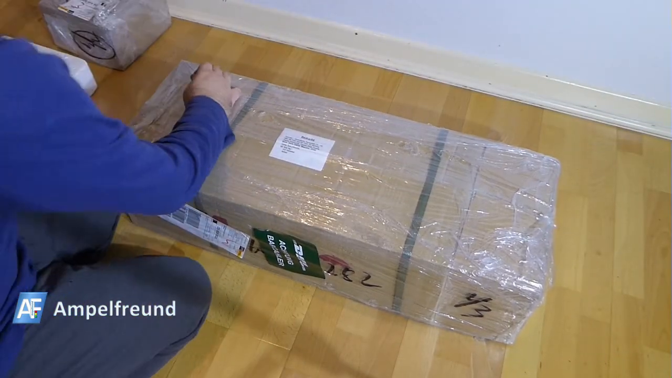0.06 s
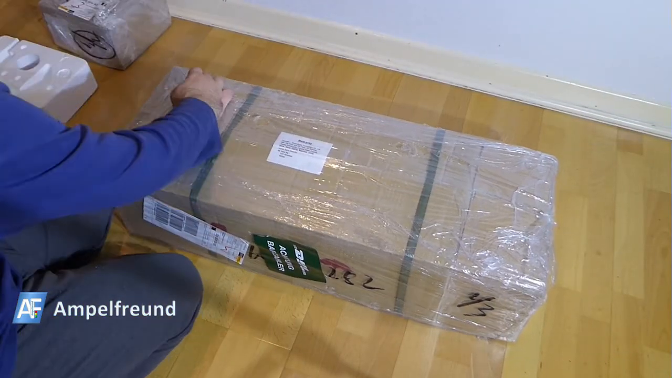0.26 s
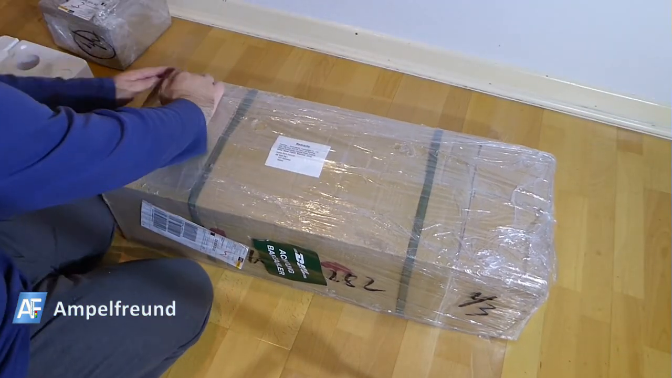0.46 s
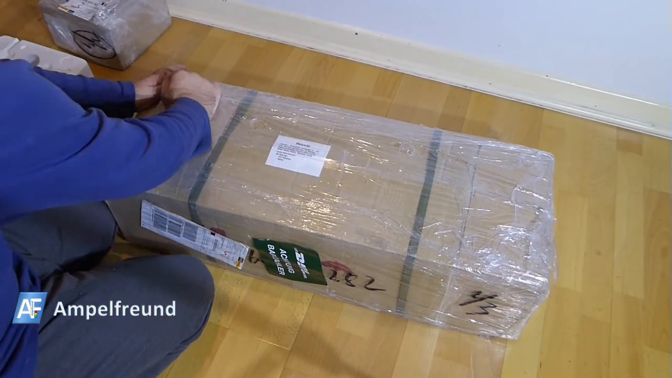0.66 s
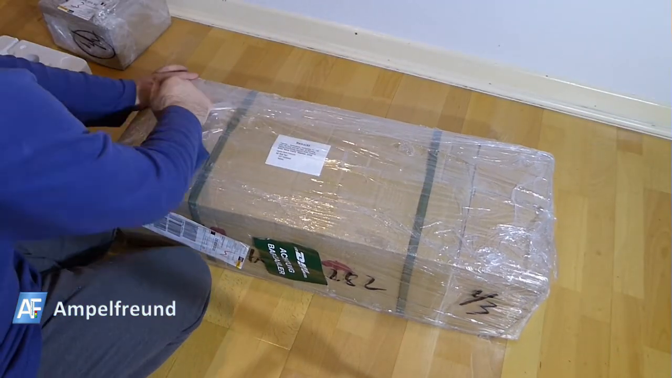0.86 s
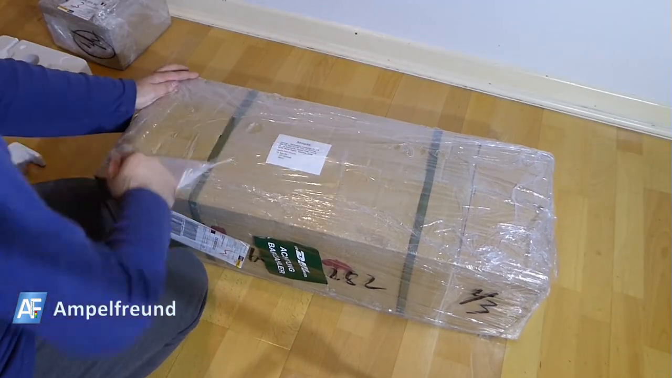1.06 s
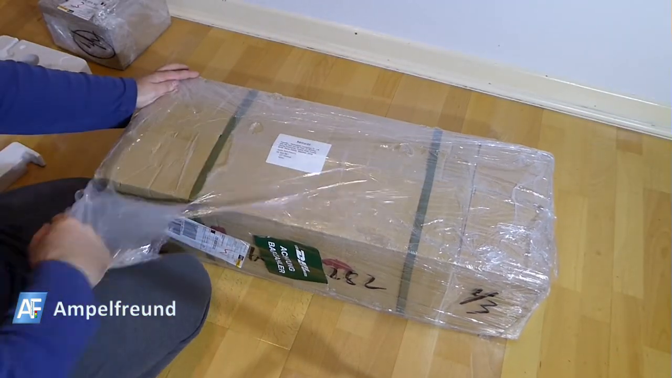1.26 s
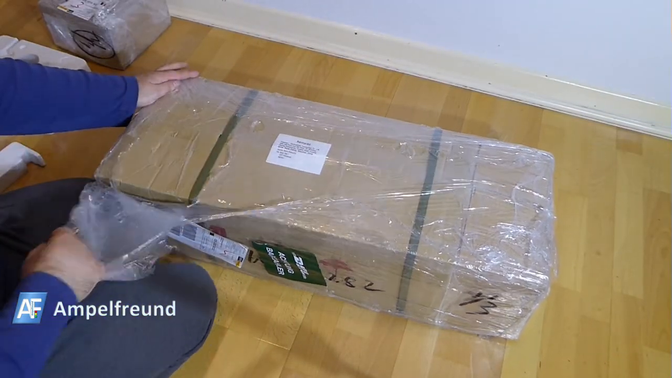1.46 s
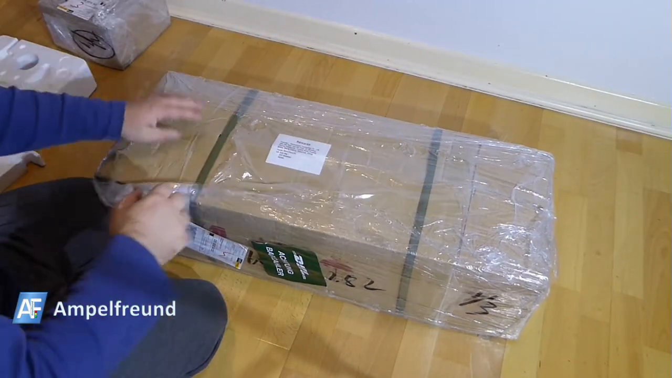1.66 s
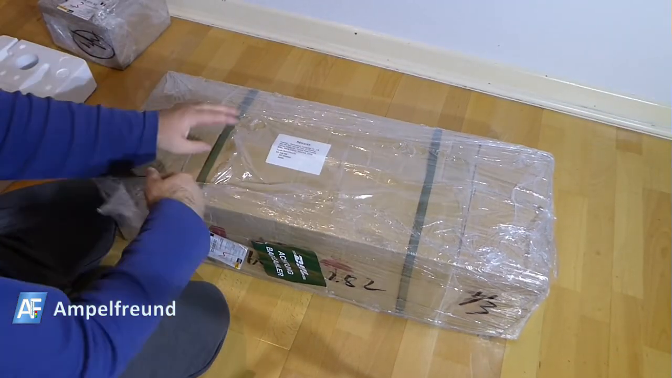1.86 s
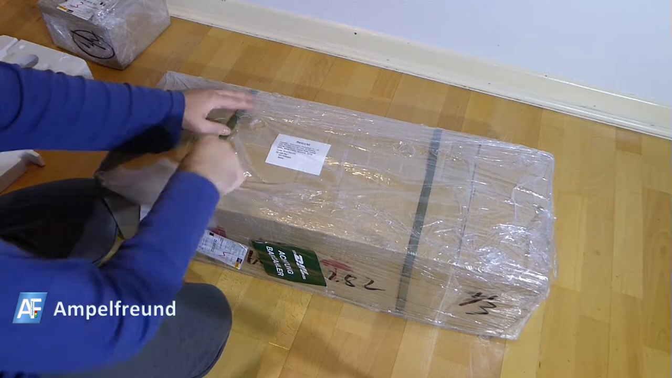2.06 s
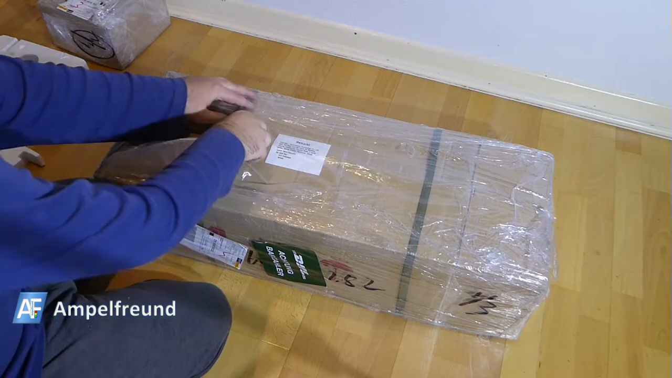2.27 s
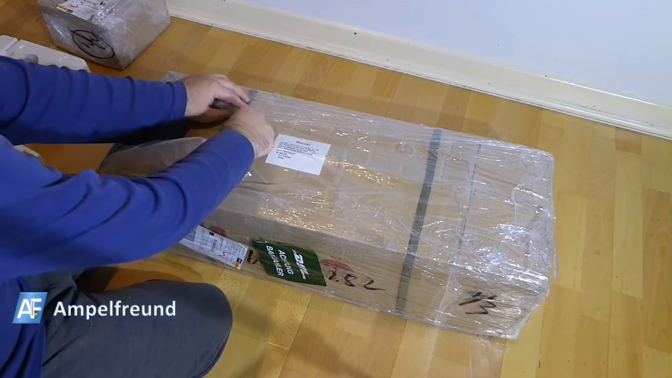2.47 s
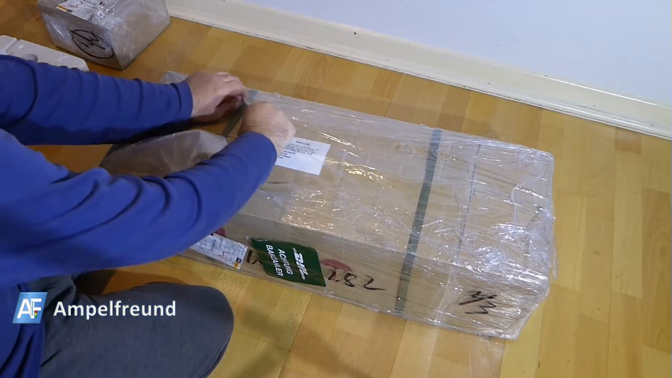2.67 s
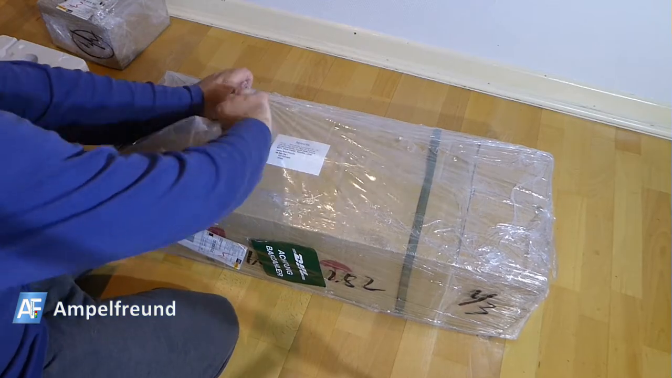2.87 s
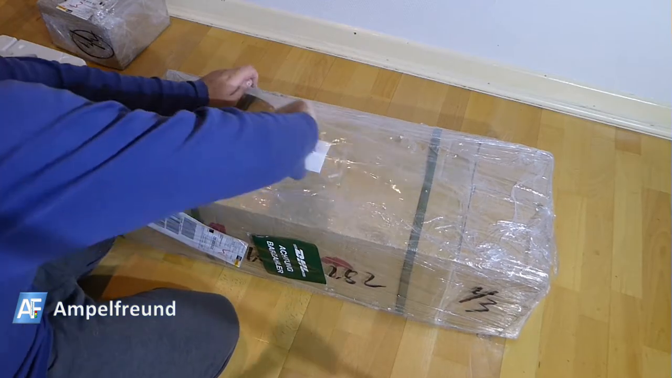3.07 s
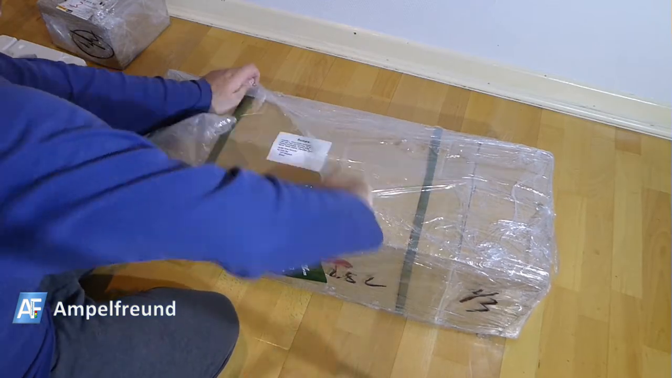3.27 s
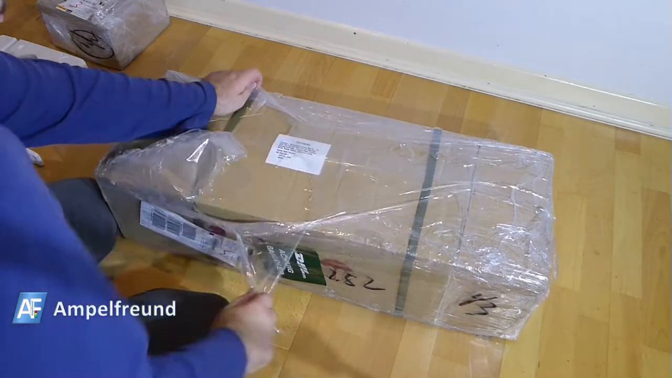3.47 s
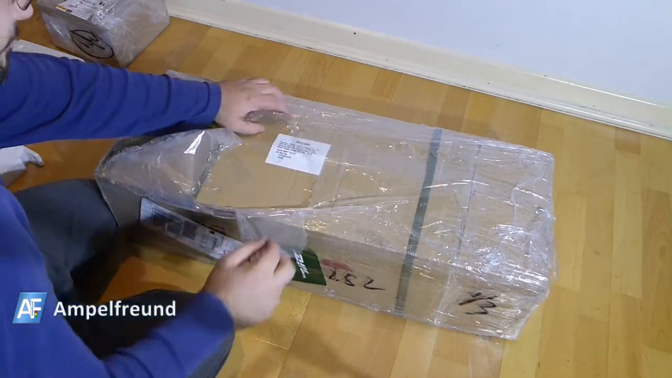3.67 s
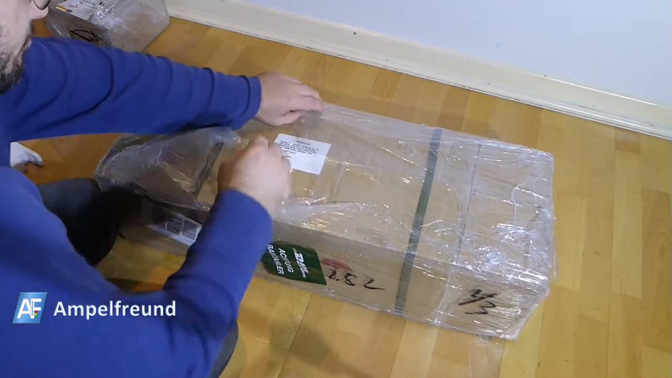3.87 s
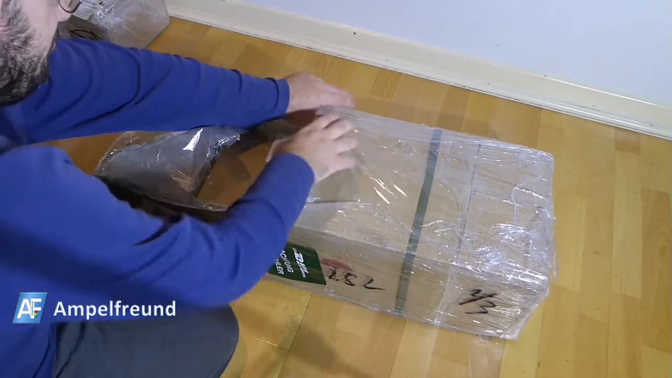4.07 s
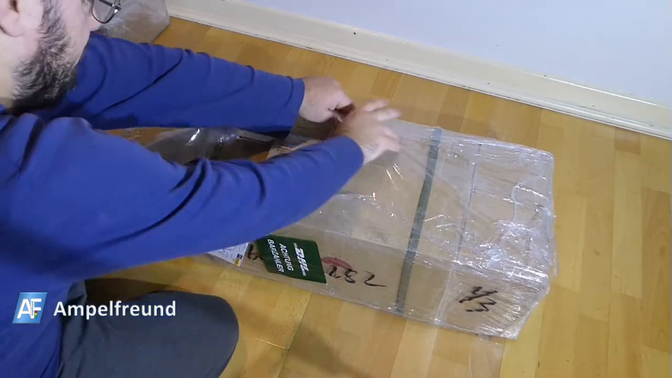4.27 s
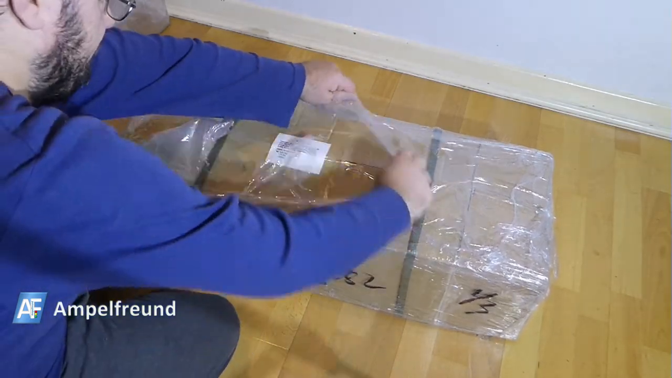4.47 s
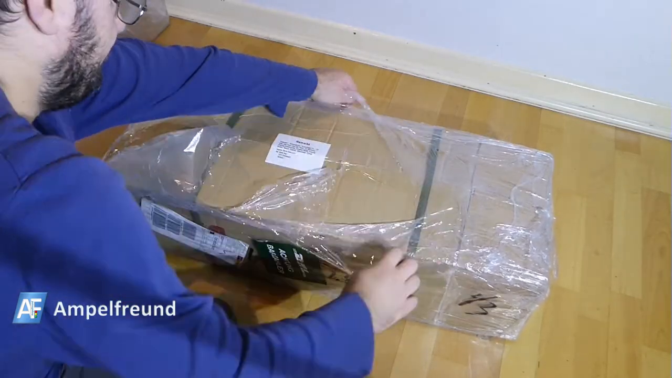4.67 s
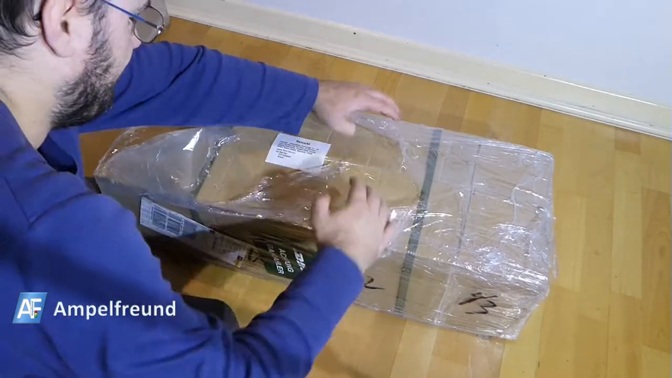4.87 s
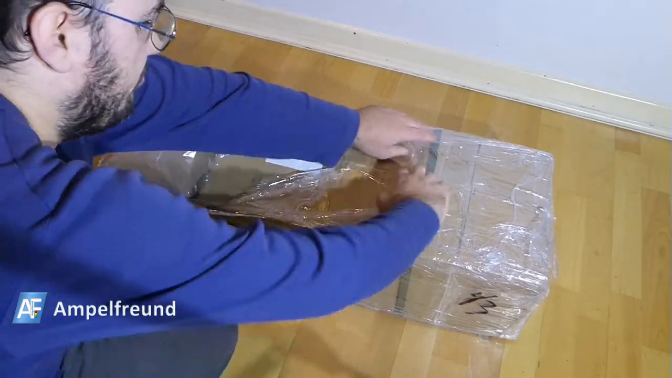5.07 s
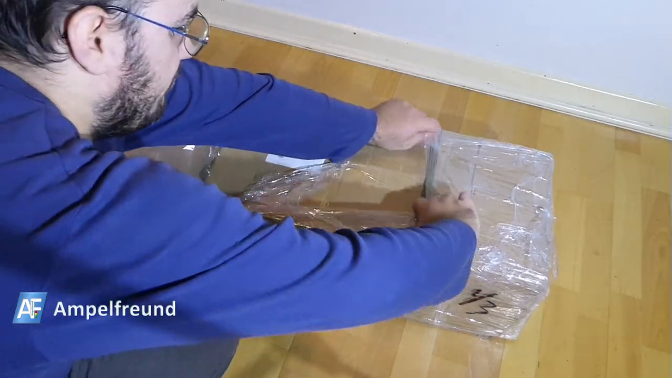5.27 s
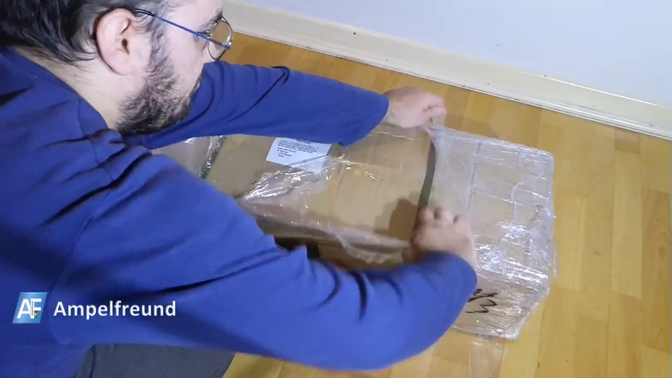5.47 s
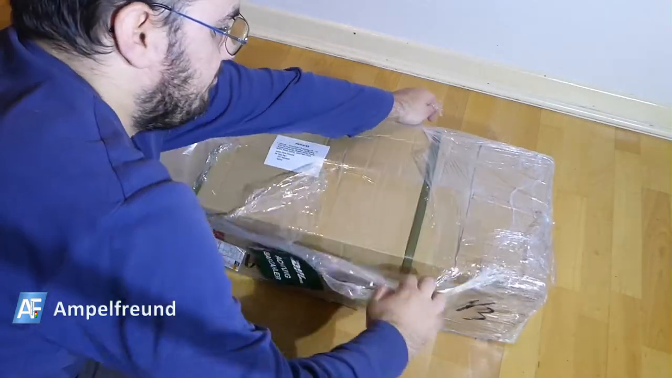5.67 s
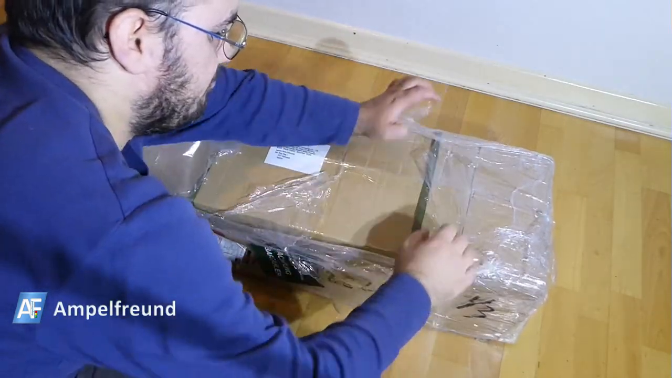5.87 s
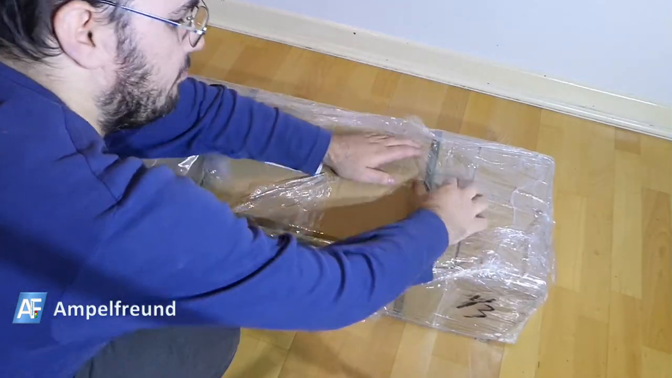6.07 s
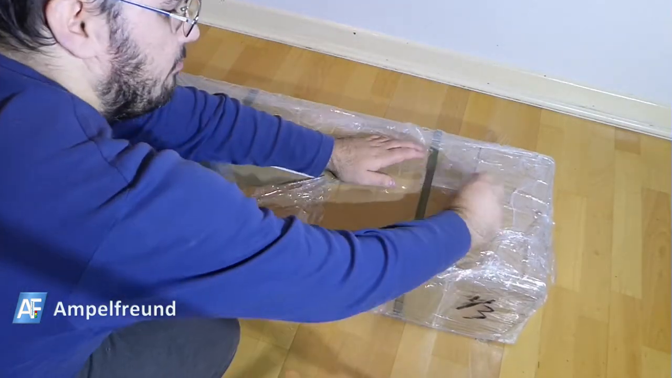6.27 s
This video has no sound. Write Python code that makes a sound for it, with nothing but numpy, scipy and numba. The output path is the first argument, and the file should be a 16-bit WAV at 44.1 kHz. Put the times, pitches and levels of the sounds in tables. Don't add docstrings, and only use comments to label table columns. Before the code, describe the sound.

Close stereo pickup, about a metre away, in a small bare room with short reflections and faint hiss and hum. Bright plastic crackle bursts out immediately, with sharp snaps and a hollow cardboard tap near 0.17 s, then eases to fine rustling. From 0.6 to 0.9 s a hard tug brings a dense volley of snaps and short singing pings; another ripping pull peaks around 1.3 s. The crackle thins from 1.5 s, with small knocks and a duller palm thump at 2.3 s. Quiet until 2.6 s, then crinkling builds again through 3.0-3.5 s with crisp pops. After soft cardboard rubbing and bumps near 3.7 s, a strong tear comes at 4.5 s, a lull around 5 s, and a loud crackling tug at 5.5 s. It fades to light rustle and box bumps near 6.1 s, ending on a small final snap at 6.3 s.

```python
import sys
import numpy as np
from scipy import signal
from scipy.fft import rfft, irfft, next_fast_len
from scipy.io import wavfile
from scipy.ndimage import map_coordinates
from numba import njit

SR = 44100
rng = np.random.default_rng(int(sys.argv[2]) if len(sys.argv) > 2 else 0)


def int16_out(signal):
    q = np.round(np.clip(np.atleast_2d(signal).T, -1, 1) * 32767)
    wavfile.write(sys.argv[1], SR, q.astype(np.int16))


def natural_amplitude(level_db):
    exponent = np.asarray(level_db, float) / 20
    return 10 ** exponent


N = 279153
PORT_LAG_S = 1.3e-5


def level(x, db):
    return x * natural_amplitude(db) / np.sqrt(np.mean(x ** 2))


def read(table, hz):
    table_hz, table_db = np.transpose(table)
    return np.interp(np.log(hz), np.log(table_hz), table_db)


def colour(x, table):
    n = next_fast_len(N + 4096)
    hz = np.arange(1, n // 2 + 2) * SR / n
    return irfft(rfft(x, n) * natural_amplitude(read(table, hz)), n)[..., :N]


@njit
def rings(start, pole, left, right, n):
    out = np.zeros((2, n))
    for k in range(len(start)):
        z, i = 1 + 0j, start[k]
        while i < n and z.real * z.real + z.imag * z.imag > 1e-4:
            out[0, i] += (left[k] * z).imag
            out[1, i] += (right[k] * z).imag
            z *= pole[k]
            i += 1
    return out


def grains(s, hz, t60, db, pan_db, lag_s=0., sign=1):
    start = np.clip(s * SR, 0, N).astype(np.int64)
    pole = np.exp((2j * np.pi * np.clip(hz, 40, .45 * SR) - np.log(1000) / t60) / SR)
    turn = np.exp(1j * np.pi * hz * lag_s)
    left = sign * natural_amplitude(db + pan_db / 2) * turn
    right = sign * natural_amplitude(db - pan_db / 2) / turn
    return rings(start, pole, left, right, N)


def fading(kicks, fade_s):
    return signal.lfilter([1], [1, -np.exp(-1 / (fade_s * SR))], kicks)


def avalanches(rate, fade_s, depth_db):
    wave = fading(rng.random(N) < rate / SR, fade_s)
    return depth_db * (wave - wave.mean()) / wave.std()


def after(rows, below_db, fade_s):
    rows = np.array(rows)
    kicks = np.zeros(N)
    np.add.at(kicks, (rows[:, 0] * SR).astype(int), natural_amplitude(rows[:, 1] + below_db))
    return fading(kicks, fade_s)


def efforts(rows):
    s, db, build_s, release_s = np.transpose(rows)[..., None]
    t = np.arange(0, N, 64) / SR
    away = np.where(t < s, (s - t) / build_s, (t - s) / release_s)
    strength = np.sqrt(np.sum(natural_amplitude(db - 20 * away) ** 2, axis=0))
    return np.interp(np.arange(N) / SR, t, strength)


def hands_pan_db(t):
    return .4 - .3 * t


def swarm(count, table, cycles, scatter_db, wide_db, gain_db):
    when, size, pitch, place = rng.random((count, 4)).T
    s = when * N / SR
    low, high = np.log(np.array(table)[[0, -1], 0])
    hz = np.exp(low + (high - low) * pitch)
    db = read(table, hz) + 20 * np.log10(hz) - scatter_db * np.log(1 - .995 * size)
    t60 = cycles / hz + 0.0006
    unit = np.sqrt(np.sum(natural_amplitude(db) ** 2 * t60) * SR / N / (4 * np.log(1000)))
    side = 2 * place - 1
    sign = np.where(np.arange(count) % 2, 1, -1)
    pan_db = hands_pan_db(s) + wide_db * side
    return grains(s, hz, t60, db + gain_db(s, hz), pan_db, PORT_LAG_S * side, sign) / unit


# hardest_s, crackle_db, build_up_s (its last 20 dB), release_s (its first 20 dB)
TUGS = [(0.021, -30.5, 0.05, 0.19), (0.096, -36.0, 0.15, 0.67), (0.106, -32.0, 0.05, 0.04),
        (0.281, -38.0, 0.05, 0.03), (0.483, -39.5, 0.23, 0.03), (0.544, -38.5, 0.08, 0.18),
        (0.742, -27.0, 0.19, 0.39), (0.811, -26.5, 0.01, 0.58), (0.892, -24.0, 0.08, 0.05),
        (1.098, -32.0, 0.57, 0.01), (1.185, -29.0, 0.31, 0.27), (1.303, -23.5, 0.01, 0.025),
        (1.331, -40.0, 0.26, 0.7), (1.396, -36.5, 0.16, 0.7), (1.79, -43.5, 2.44, 0.16),
        (2.093, -40.0, 0.11, 0.18), (2.162, -41.0, 0.01, 0.34), (2.467, -57.5, 0.04, 0.38),
        (2.618, -34.5, 0.06, 0.21), (2.706, -34.0, 0.04, 0.22), (2.87, -38.5, 0.04, 0.07),
        (2.97, -44.5, 0.02, 0.16), (3.027, -41.0, 0.01, 0.5), (3.079, -33.5, 0.08, 0.07),
        (3.109, -30.0, 0.02, 0.36), (3.179, -31.0, 0.14, 0.35), (3.261, -28.0, 0.15, 0.19),
        (3.394, -30.5, 0.52, 0.3), (3.492, -32.5, 0.02, 0.16), (3.57, -35.5, 0.16, 0.02),
        (3.742, -46.0, 0.25, 0.12), (3.839, -37.5, 0.06, 0.08), (3.96, -44.0, 0.21, 0.04),
        (4.211, -41.5, 0.31, 0.12), (4.297, -31.5, 0.07, 0.28), (4.406, -33.5, 0.08, 0.09),
        (4.45, -30.0, 0.04, 0.03), (4.526, -26.0, 0.01, 0.09), (4.53, -26.5, 0.17, 0.09),
        (4.608, -29.5, 0.36, 0.25), (4.806, -34.0, 0.8, 0.11), (5.189, -38.0, 0.21, 0.18),
        (5.303, -36.0, 0.06, 0.02), (5.375, -33.0, 0.19, 0.02), (5.453, -31.5, 0.11, 0.01),
        (5.522, -23.0, 0.15, 0.3), (5.718, -27.5, 0.06, 0.26), (6.075, -46.0, 0.02, 0.92),
        (6.295, -39.5, 0.02, 0.14), (6.324, -31.5, 0.03, 0.05)]
# start_s, fine_creases_db, broad_folds_db
GRIPS = [(0.0, -2, -8.5), (0.2, -3.5, 1.5), (0.63, -1.5, -2.5), (0.75, -5.5, -6), (1.0, -4, .5),
         (1.3, 0, -5), (1.6, -3, 0), (2.2, -2.5, -2), (2.62, 1.5, -5), (2.9, -3.5, -3.5), (3.2, -1, -1.5),
         (3.45, 0, 0), (3.8, -1, -5), (4.45, -2, 1), (4.85, -3.5, -9), (5.2, -1, -3.5), (5.6, -2.5, -7.5),
         (6.0, -3, 3)]
# pitch_hz, level_db (per Hz)
FILM_SPECTRUM = [(530, -28), (900, -2), (1420, -7), (2690, -2), (5840, -4.3), (7860, -11.5), (10300, -9),
                 (15500, -5)]
# pitch_hz, level_db
SMALL_FACET = [(30, -28), (150, -26), (700, -2.5), (1200, 0)]


def crackle(rush_db):
    shaken = after(folds(), below_db=-17, fade_s=.004)
    pull_db = 20 * np.log10(efforts(TUGS) * natural_amplitude(1.7 + rush_db) + shaken)
    grip_s, fine_db, broad_db = np.transpose(GRIPS)
    patches = rng.standard_normal((400, 30))

    def gain_db(t, hz):
        fine = (np.interp(t, grip_s, fine_db) + 2.0) * np.clip(np.log2(hz / 4500), 0, 1.2)
        broad = (np.interp(t, grip_s, broad_db) + 4.0) * np.clip(np.log2(3300 / hz), 0, 1.2)
        patch = 3 * map_coordinates(patches, [t * 30, np.log2(hz / 500) * 3], order=1)
        return pull_db[(t * SR).astype(int)] + fine + broad + patch

    clicks = swarm(count=120000, table=FILM_SPECTRUM, cycles=5.8, scatter_db=1.0, wide_db=8.5, gain_db=gain_db)
    return colour(clicks, SMALL_FACET)


# hardest_s, drumming_db, build_up_s (last 20 dB), release_s (first 20 dB)
RUBS = [(0.167, -39.0, 0.02, 0.22), (0.263, -36.5, 0.03, 0.14), (0.582, -40.5, 0.27, 0.19),
        (0.709, -31.5, 0.08, 0.03), (0.891, -33.0, 0.02, 0.1), (1.045, -33.0, 0.28, 0.07),
        (1.307, -31.5, 0.26, 0.38), (1.661, -34.5, 0.006, 0.12), (1.825, -39.5, 0.01, 0.12),
        (2.038, -41.5, 0.01, 0.28), (2.342, -41.5, 0.51, 0.53), (2.611, -45.0, 0.17, 0.13),
        (2.711, -40.0, 0.01, 0.36), (2.88, -38.0, 0.02, 0.16), (2.966, -37.5, 0.06, 0.35),
        (3.405, -34.5, 0.14, 0.4), (3.671, -37.5, 0.03, 0.29), (3.804, -32.5, 0.03, 0.16),
        (4.231, -36.5, 0.09, 0.74), (4.441, -37.0, 0.02, 0.62), (4.565, -30.5, 0.28, 0.25),
        (5.056, -38.5, 0.02, 0.31), (5.203, -35.5, 0.14, 0.4), (5.539, -30.0, 0.13, 0.28),
        (5.803, -39.5, 0.18, 0.17), (6.073, -37.5, 0.02, 0.16), (6.138, -40.0, 0.03, 0.64),
        (6.321, -36.5, 0.03, 0.16)]
# pitch_hz, level_db (per Hz)
CARD_SPECTRUM = [(53, -53), (90, -23), (128, -25), (268, -1), (516, 6), (656, 0), (1150, -1.5), (1820, -18)]


def drumming(rush_db):
    drag_db, boom_under_card_db = -12, -19
    drag = np.hypot(efforts(TUGS) * natural_amplitude(drag_db), efforts(RUBS))
    shudder = after(PALMS, below_db=-12, fade_s=.06)
    card_db = 20 * np.log10(drag)
    boom_db = 20 * np.log10(drag * natural_amplitude(boom_under_card_db) + shudder)

    def gain_db(t, hz):
        i = (t * SR).astype(int)
        return np.where(hz > 230, card_db[i] - 2.5, boom_db[i] + 19.5) + 0.29 * rush_db[i]

    card = swarm(count=9000, table=CARD_SPECTRUM, cycles=11.1, scatter_db=2.0, wide_db=4.5, gain_db=gain_db)
    return colour(card, [(30, -20), (100, 3.5), (1500, 0.5), (4000, -19)])


# pitch_hz, level_db (per Hz)
AIR_SPECTRUM = [(30, -12), (197, 2), (432, 4), (691, -10), (1080, -9), (2020, -13), (5170, -18),
                (15500, -34)]


def room_air():
    mid, side = colour(rng.standard_normal((2, N)), AIR_SPECTRUM)
    return level(mid + 0.52 * side * np.array([[1], [-1]]), -53)


# start_s, level_db, ring_hz, brightness_db
TICKS = [(0.0009, -29, 3700, -3), (0.0222, -20, 2150, -5), (0.0293, -25, 2800, -9),
         (0.1775, -30, 3190, -14), (0.0745, -23, 4000, -3), (0.3835, -39, 1720, -4), (0.4414, -38, 8440, 3),
         (0.5222, -38, 4820, 1), (0.5467, -36, 3790, -3), (0.0802, -25, 2400, -5), (0.6175, -27, 7320, 2),
         (0.6589, -31, 5680, -2), (0.7036, -17, 3000, -9), (0.7552, -20, 2760, -12),
         (0.7851, -17, 3960, -7), (0.8305, -24, 4820, -8), (0.877, -19, 2200, -4), (1.1019, -23, 1980, -8),
         (1.1263, -29, 4910, -7), (3.3345, -22, 9500, 3), (1.495, -34, 4480, -6), (1.5693, -35, 4390, -5),
         (1.8197, -29, 1700, -8), (2.0333, -46, 5600, -1), (2.1071, -35, 1460, -14),
         (2.1645, -39, 4910, -10), (2.1974, -39, 3790, -7), (2.3381, -45, 1210, -6),
         (2.6978, -34, 4740, -8), (2.7806, -35, 3700, -12), (2.8774, -38, 4910, -8),
         (2.9786, -37, 1980, -10), (3.4326, -27, 8790, 3), (3.6571, -38, 9220, 1), (4.0517, -45, 6120, -2),
         (4.2168, -38, 3010, -12), (5.1682, -39, 6980, -1), (5.2405, -38, 9990, 4), (5.2904, -34, 2330, -4),
         (5.2959, -33, 4740, -8), (5.4206, -30, 5600, -1), (3.2725, -23, 9800, 4), (5.8217, -30, 4740, -5),
         (5.8541, -33, 3620, -14), (5.88, -33, 3530, -14), (5.9349, -40, 2580, -12),
         (6.2976, -37, 3450, -3), (6.32, -28, 1210, -2)]
# start_s, level_db, ring_hz, brightness_db
SNAPS = [(0.0197, -19.5, 4300, -5), (0.0722, -24, 2800, -8), (0.0785, -23, 2500, -9),
         (0.1640, -15.5, 3700, -3), (0.172, -25, 3400, -14), (0.6152, -21, 7000, 2),
         (0.7016, -13, 2000, -4), (0.7213, -17.5, 3400, -12), (0.7493, -21, 4570, -1),
         (0.7829, -16, 3900, -2), (0.854, -18, 6500, 4), (0.8567, -15.5, 6300, 1), (1.1019, -20, 1980, -12),
         (1.2751, -15, 3700, 2), (1.4979, -27, 4820, -2), (2.8748, -36, 1030, -2), (3.3031, -20, 5000, -3),
         (4.4565, -20, 2400, -16), (4.5085, -21, 2500, -12), (3.113, -24, 4500, -3),
         (6.3173, -22, 1400, -1)]
GIVES_LATER_S = (0, .0027, .0085)
GIVES_DB = (0, -3, -8)
# start_s, level_db, ring_hz, brightness_db
POPS = [(0.251, -30, 1850, -8), (0.2587, -31, 3100, -8), (0.4649, -31, 1850, -1), (0.5746, -28, 1510, -7),
        (0.6628, -22, 3500, -3), (0.7245, -16.5, 3060, -9), (0.742, -20, 3060, -13),
        (0.796, -21, 3100, -10), (0.8289, -22, 1980, -8), (0.8389, -15.5, 1900, 0), (0.8875, -19, 3750, -8),
        (1.0239, -20, 2330, -10), (1.0349, -21, 4010, 5), (1.1902, -25, 2800, -3), (1.1999, -24, 5640, 0),
        (1.3040, -17, 2700, 2), (1.6571, -23, 3000, -12), (1.9562, -37, 8960, 5), (2.1034, -28, 1680, -11),
        (2.7511, -26, 3830, -7), (3.0394, -30, 4500, 4), (3.3371, -19, 6070, 0), (3.4084, -17.5, 2630, 1),
        (5.3511, -24, 5250, -7), (5.4511, -26, 2930, 0), (5.4768, -19, 3530, -4), (5.4853, -18.5, 3010, -9),
        (5.5226, -17, 3450, -12), (5.7243, -25, 3660, -4), (5.7501, -24, 2630, -7)]


def folds():
    rips = [np.array(SNAPS) + [s, db, 0, 0] for s, db in zip(GIVES_LATER_S, GIVES_DB)]
    return np.vstack(rips + [POPS, TICKS])


def snaps(count=15):
    s, db, hz, bright_db = folds().T[..., None]
    lag, pitch, place = np.moveaxis(rng.random((len(s), count, 3)), 2, 0)
    late = lag ** 1.6
    own = np.arange(count) % 3 == 0
    ring = np.where(own, hz * np.exp(.14 * (pitch - .5)), 2200 * 6.5 ** pitch)
    t60 = 5 / ring + 0.0008
    tilt_db = (bright_db + 3.5) * np.clip(np.log2(ring / 3000) / 1.3, 0, 1.1)
    share_db = -8 * late + np.where(own, 0, -0.5 + tilt_db)
    share_db -= 10 * np.log10(np.sum(natural_amplitude(share_db) ** 2 * t60 * 1000, axis=1)[:, None])
    when = s + .0009 * late
    buckle = np.where(place[:, :1] < .5, 1, -1) * np.ones_like(place)
    clicks = grains(when.ravel(), ring.ravel(), t60.ravel(), (db + 12.5 + share_db).ravel(),
                    3 * (place.ravel() - .5), sign=buckle.ravel())
    return colour(clicks, SMALL_FACET)


@njit
def walls(x, lags, gain, damp):
    line, soft, out = np.zeros((8, 4096)), np.zeros(8), np.zeros((2, len(x)))
    for i in range(len(x)):
        total = 0.
        for k in range(8):
            soft[k] += (1 - damp) * (gain[k] * line[k, (i - lags[k]) & 4095] - soft[k])
            total += soft[k]
            out[k % 2, i] += soft[k]
        for k in range(8):
            line[k, i & 4095] = x[i] + soft[k] - total / 4
    return out


def room(near):
    t60_s, damp, room_db = 0.46, 0.16, -13
    lags = np.array([149, 283, 431, 617, 829, 1093, 1361, 1699])
    left, right = walls(near.mean(axis=0), lags, natural_amplitude(-60 * lags / SR / t60_s), damp)
    mid = (left + right) / 2
    side = colour((left - right) / 2, [(30, 7), (100, -20), (800, -1.5), (12000, -2)])
    return natural_amplitude(room_db) * (mid + side * np.array([[1], [-1]]))


# start_s, level_db, panel_hz, t60_s
TAPS = [(0.1632, -29.5, 870, .027), (0.1652, -28, 479, .027), (0.2503, -36, 800, .03),
        (0.701, -32, 1304, .027), (0.7029, -25, 546, .02), (0.7769, -33, 840, .025),
        (0.8888, -24, 880, .012), (0.8895, -31.5, 415, .091), (1.227, -33.5, 520, .049),
        (1.2753, -24.5, 543, .035), (1.2884, -31, 1035, .059), (1.6588, -36, 1160, .016),
        (1.6612, -36, 460, .02), (1.8195, -28, 560, .013), (2.3378, -36, 424, .029),
        (2.8748, -36, 600, .02), (3.0037, -28.5, 447, .022), (3.1664, -35, 746, .027),
        (3.666, -28.5, 405, .016), (3.828, -36, 420, .03), (4.2404, -28, 950, .02),
        (4.4537, -33, 665, .048), (4.5598, -34, 437, .065), (4.5693, -26, 484, .017),
        (5.0517, -37, 400, .056), (5.1915, -34, 690, .03), (5.189, -35, 920, .03), (3.705, -40, 800, .03),
        (3.838, -36, 1020, .03), (5.0545, -33, 700, .015), (0.08, -34, 1300, .02), (6.155, -36, 750, .02),
        (5.5376, -23.5, 430, .014), (5.5603, -29, 371, .039), (6.082, -33, 448, .019),
        (6.3185, -34.5, 444, .032)]
# start_s, level_db, panel_hz, t60_s
PALMS = [(0.165, -40, 230, .04), (0.56, -45, 200, .04), (0.70, -38, 230, .04), (1.07, -35, 220, .06),
         (1.28, -36, 240, .06), (2.2925, -22, 245, .04), (2.304, -32, 148, .11), (2.9681, -37, 230, .2),
         (2.9736, -31.5, 141, .064), (3.0352, -36, 140, .079), (3.3338, -29, 343, .03),
         (3.41, -41, 220, .05), (3.6655, -27, 260, .018), (3.685, -41, 150, .08), (5.145, -37, 190, .06),
         (5.165, -37, 200, .04), (4.497, -33, 218, .06), (4.5606, -28, 231, .094), (5.0517, -33, 228, .078),
         (5.067, -34, 139, .16), (5.5227, -28.5, 369, .046), (6.077, -39, 170, .08),
         (6.1489, -29, 265, .035)]


def knocks(count=5):
    s, db, hz, t60 = np.vstack([PALMS, TAPS]).T
    t60 = np.clip(1.6 * t60, .01, .4)
    late, pitch = np.moveaxis(rng.random((len(s), count, 2)), 2, 0)
    near_hz = hz[:, None] * np.exp(1.4 * (pitch - .5))
    rattle_s = s[:, None] + .045 * late ** 2
    rattle_db = db[:, None] - 6 - 8 * late
    rattle = grains(rattle_s.ravel(), near_hz.ravel(), (9 / near_hz).ravel(), rattle_db.ravel(), 0.)
    pad = grains(s, hz, np.minimum(2.4 / hz, .4 * t60), db + 7, 0.)
    panel = grains(s, hz, t60, db + 7.5, 0.)
    return pad - panel + rattle


# start_s, level_db, pitch_hz, t60_s
RINGS = [(0.1028, -32, 4950, 0.025), (0.1626, -33, 5000, 0.025), (0.1656, -29, 470, 0.04),
         (0.1706, -30, 3450, 0.025), (0.2534, -34, 520, 0.04), (0.6146, -35, 2020, 0.025),
         (0.7014, -27, 2840, 0.025), (0.7014, -27, 3230, 0.025), (0.7014, -27, 4130, 0.025),
         (0.7024, -20, 1380, 0.04), (0.709, -20, 1330, 0.035), (0.7290, -20, 2500, 0.025),
         (0.7473, -28, 4480, 0.025), (0.7822, -27, 4010, 0.025), (0.8541, -27, 5810, 0.025),
         (0.894, -26, 900, 0.03), (0.9299, -30, 470, 0.04), (1.1025, -25, 1900, 0.025),
         (1.2741, -24, 3600, 0.025), (1.303, -26, 2630, 0.025), (2.42, -42, 880, 0.04),
         (1.658, -37, 1250, 0.04), (1.6595, -27, 430, 0.025), (1.8195, -36, 900, 0.03),
         (2.8785, -35, 430, 0.04), (3.232, -27, 2900, 0.04), (3.2506, -29, 4440, 0.025),
         (3.3095, -29, 5680, 0.025), (3.3394, -31, 560, 0.04), (3.4082, -28, 2630, 0.025),
         (3.8123, -34, 430, 0.04), (3.8453, -30, 470, 0.04), (4.254, -33, 900, 0.04),
         (4.4569, -28, 1680, 0.025), (4.4579, -27, 2370, 0.025), (4.5287, -23, 2450, 0.025),
         (4.5716, -25, 470, 0.04), (4.6335, -31, 340, 0.04), (4.832, -38, 390, 0.04),
         (5.4885, -31, 470, 0.04), (5.5214, -27, 2930, 0.025), (5.5943, -29, 430, 0.04),
         (5.7409, -33, 390, 0.04), (6.3176, -37, 1590, 0.025), (6.3186, -32, 990, 0.04),
         (6.3196, -36, 3400, 0.025),
         (0.1656, -38, 1850, 0.05), (0.7024, -33, 860, 0.05), (0.7223, -29, 2260, 0.05),
        (0.7692, -33, 1230, 0.05), (1.2811, -33, 370, 0.05), (1.3799, -37, 340, 0.05),
        (1.6592, -36, 430, 0.05), (1.8209, -42, 780, 0.05), (2.1022, -44, 1770, 0.05),
        (2.31, -35, 420, 0.07), (2.8755, -41, 880, 0.05), (3.3354, -34, 540, 0.05),
        (3.6647, -35, 390, 0.05), (3.8413, -39, 800, 0.05), (4.3072, -38, 2000, 0.05),
        (4.4529, -34, 1510, 0.05), (4.5596, -33, 2130, 0.05), (5.0555, -38, 340, 0.05),
        (5.5214, -33, 800, 0.05), (5.5274, -33, 650, 0.05), (5.5464, -35, 820, 0.05)]


def singing():
    s, db, hz, t60 = np.array(RINGS).T
    t60 = np.clip(t60, .015, .2)
    rise_t60 = np.minimum(.006, .6 * t60)
    return grains(s, hz, t60, db + 5, 0.) - grains(s, hz, rise_t60, db + 5, 0.)


def scene():
    rush_db = avalanches(rate=45.0, fade_s=0.012, depth_db=.7)
    near = crackle(rush_db) + drumming(rush_db) + snaps() + knocks() + singing()
    return near + room(near) + room_air()


def band_limit(x):
    return signal.sosfilt(signal.butter(12, 15900, fs=SR, output="sos"), x)


# pitch_hz, level_db
MIC = [(30, -19.5), (90, -13), (140, -3), (6500, 1), (8000, 0), (10000, 3.5), (13000, -5), (14800, -6.5),
       (15600, -12)]


def record(dry):
    top_cut = signal.ellip(8, .2, 70, 15450, fs=SR, output="sos")
    mix = signal.sosfilt(top_cut, colour(dry, MIC))
    return band_limit(mix)


dry = scene()
out = record(dry)
int16_out(out)
```